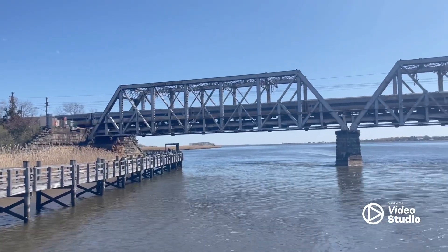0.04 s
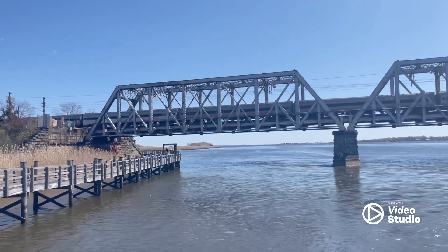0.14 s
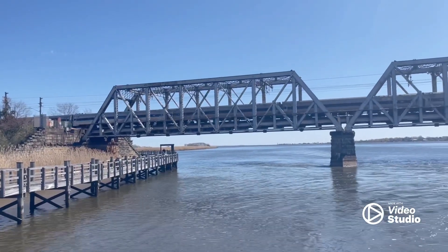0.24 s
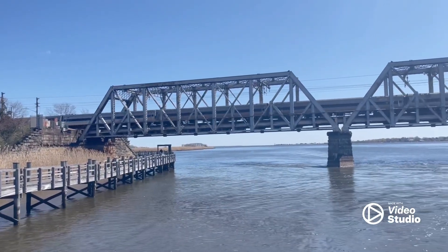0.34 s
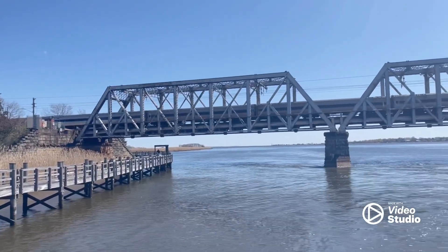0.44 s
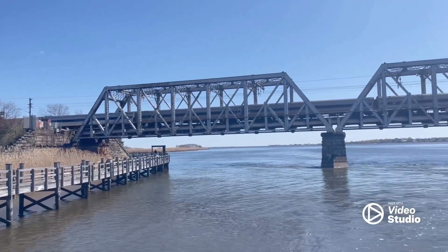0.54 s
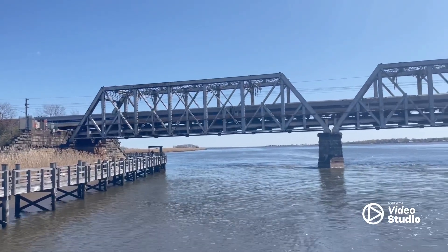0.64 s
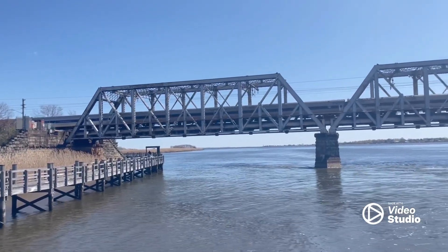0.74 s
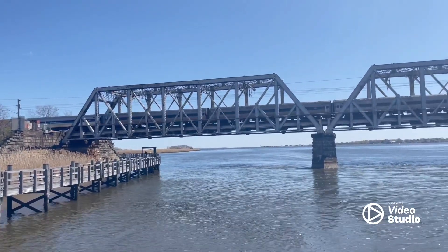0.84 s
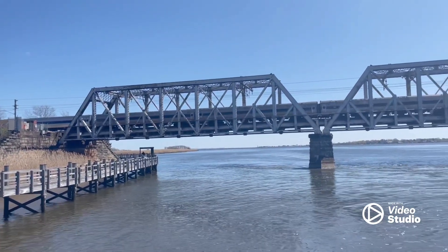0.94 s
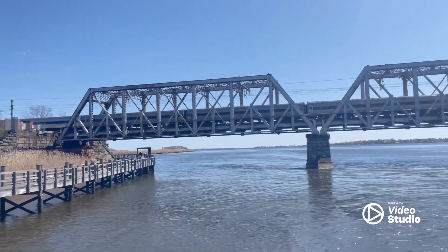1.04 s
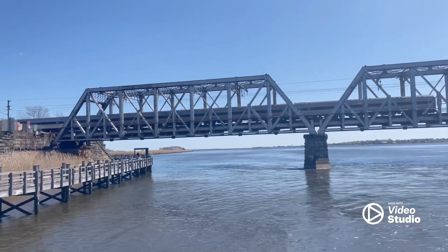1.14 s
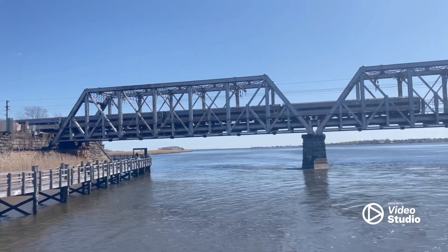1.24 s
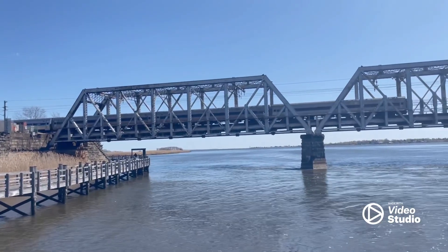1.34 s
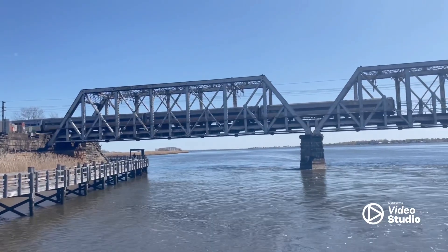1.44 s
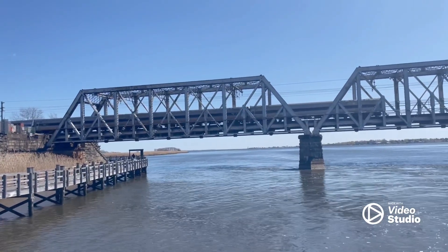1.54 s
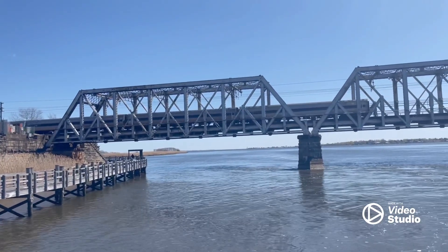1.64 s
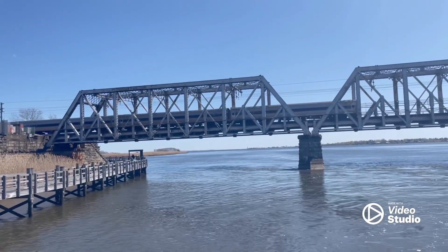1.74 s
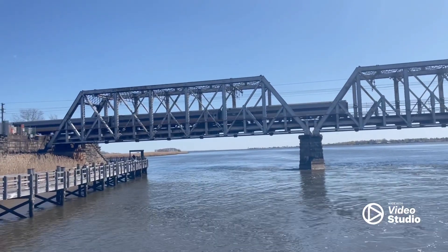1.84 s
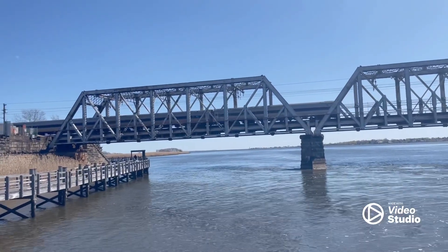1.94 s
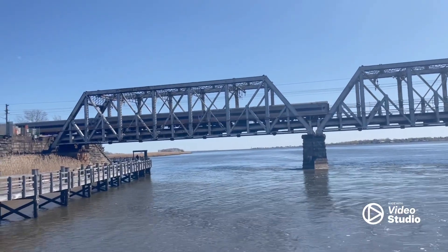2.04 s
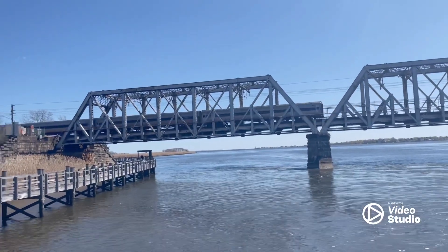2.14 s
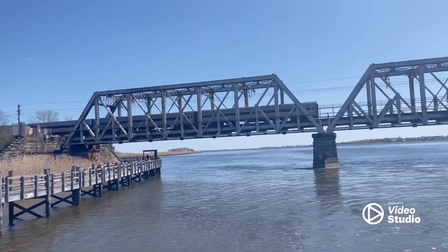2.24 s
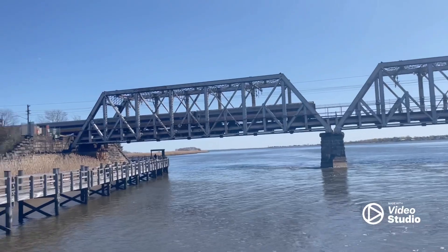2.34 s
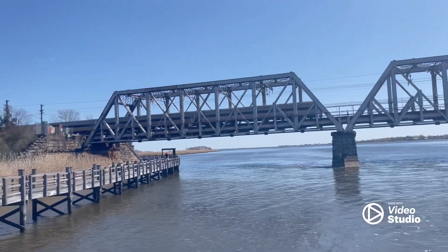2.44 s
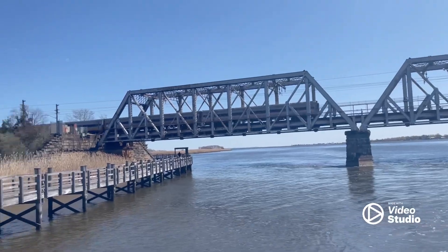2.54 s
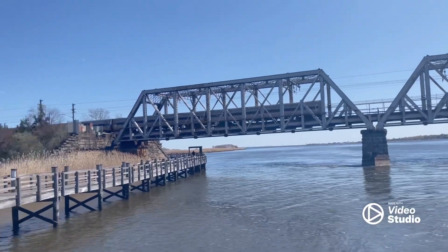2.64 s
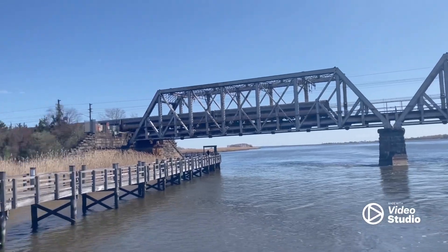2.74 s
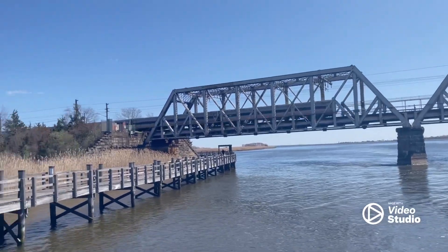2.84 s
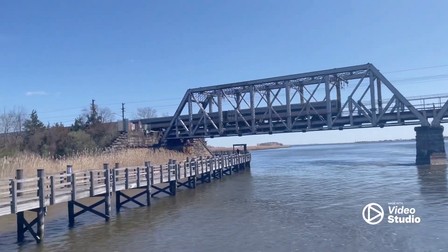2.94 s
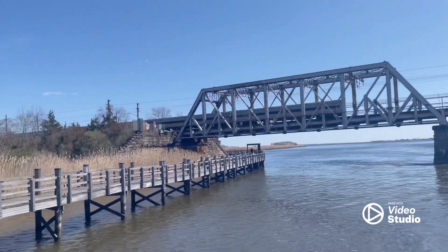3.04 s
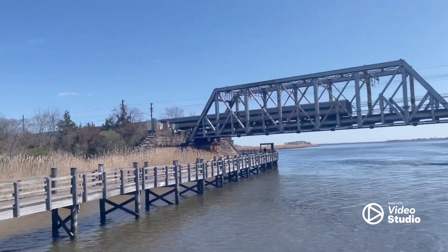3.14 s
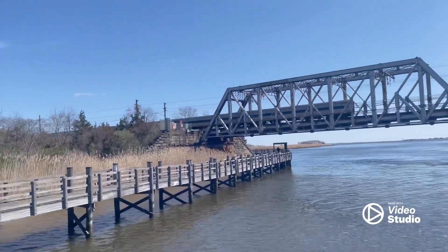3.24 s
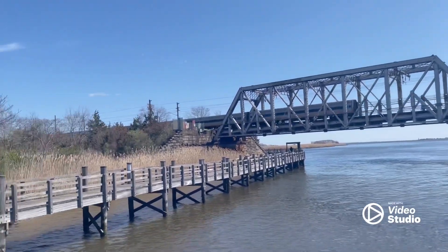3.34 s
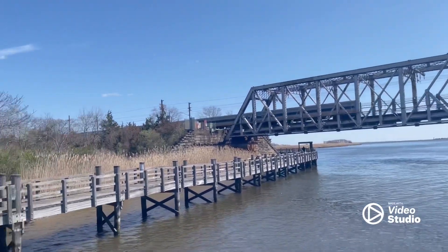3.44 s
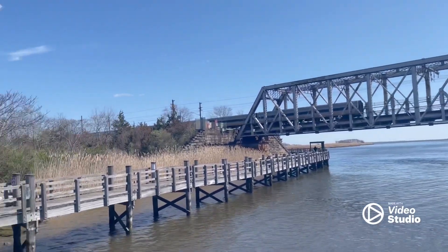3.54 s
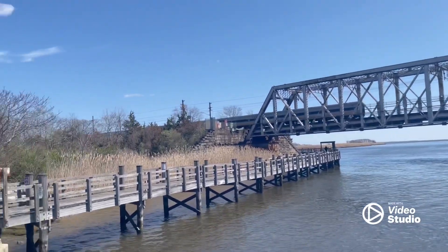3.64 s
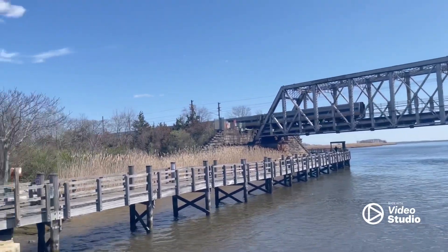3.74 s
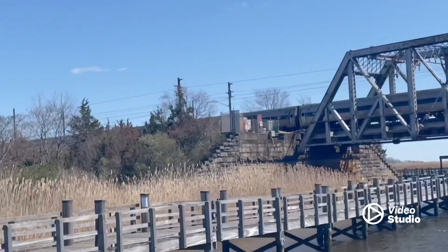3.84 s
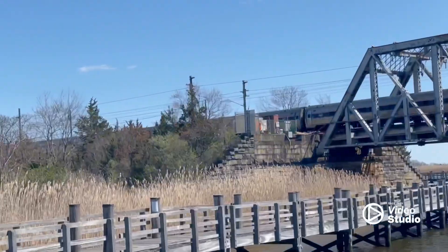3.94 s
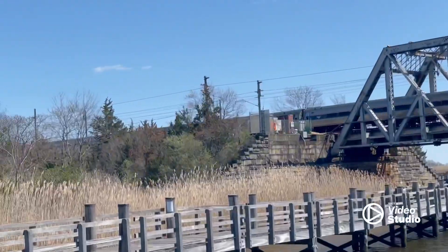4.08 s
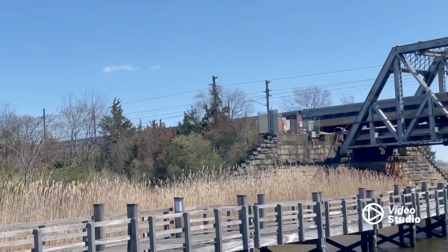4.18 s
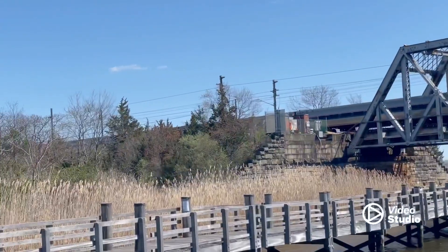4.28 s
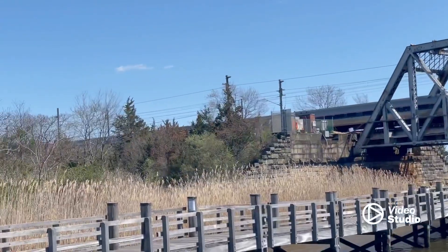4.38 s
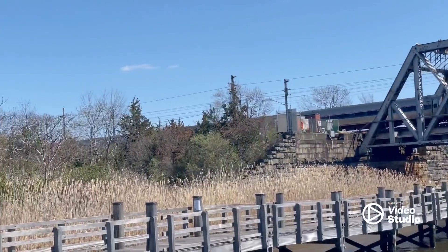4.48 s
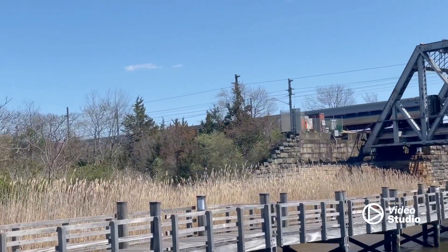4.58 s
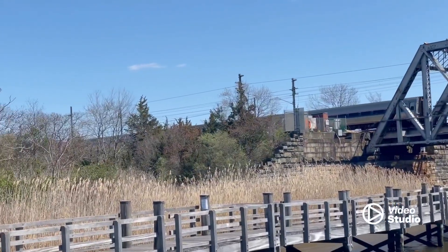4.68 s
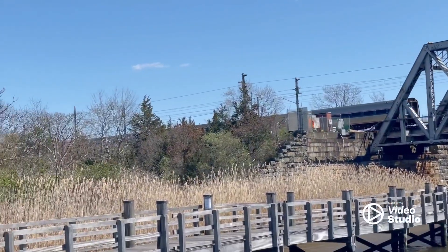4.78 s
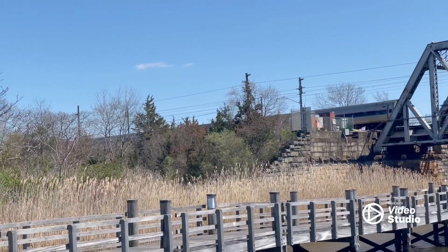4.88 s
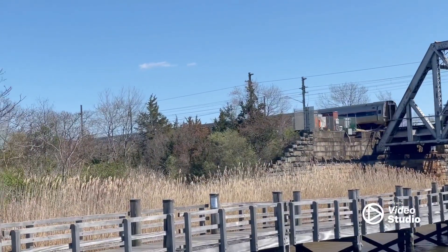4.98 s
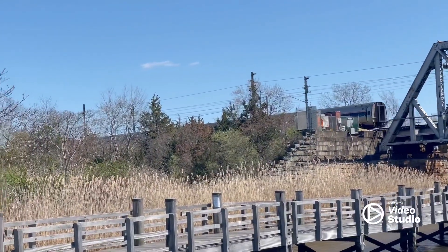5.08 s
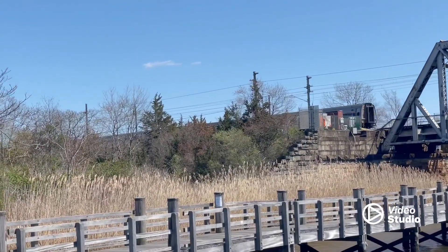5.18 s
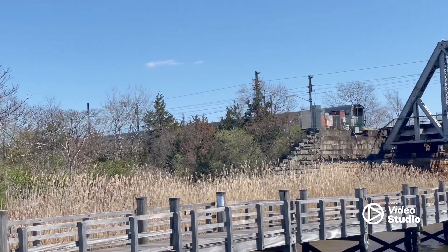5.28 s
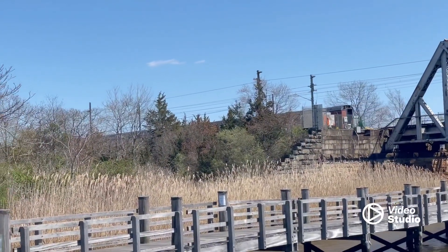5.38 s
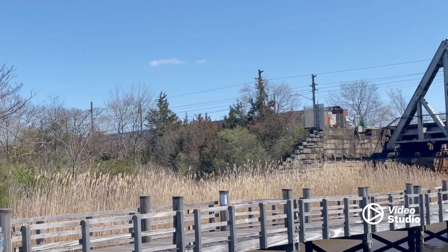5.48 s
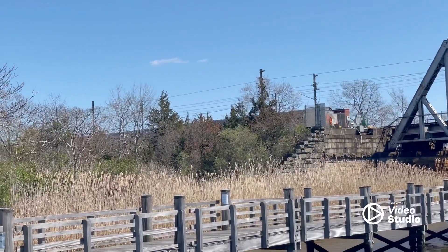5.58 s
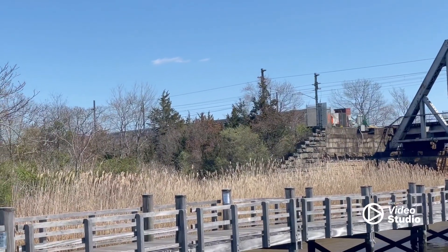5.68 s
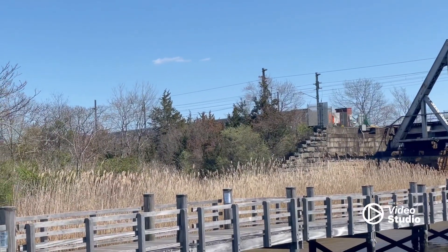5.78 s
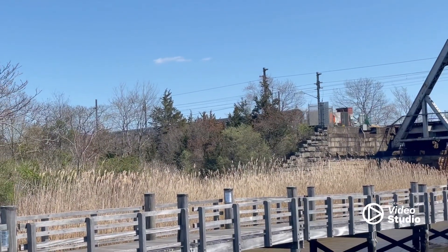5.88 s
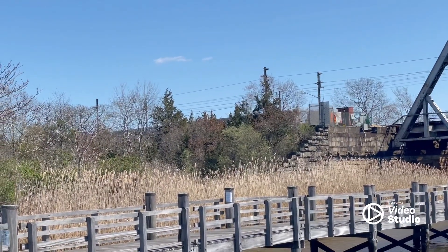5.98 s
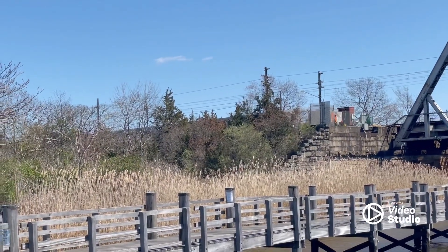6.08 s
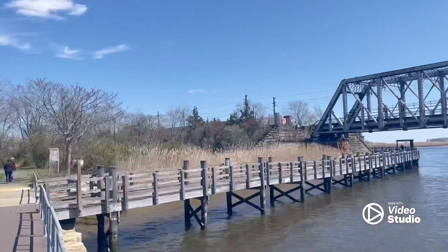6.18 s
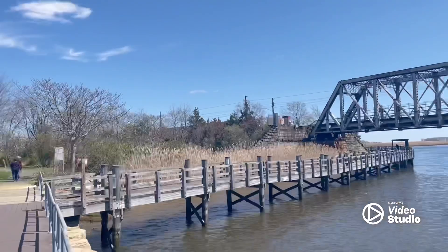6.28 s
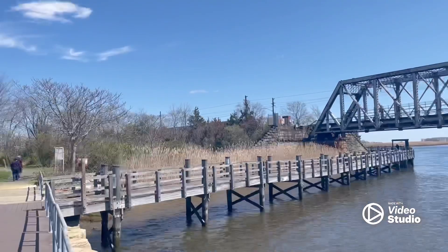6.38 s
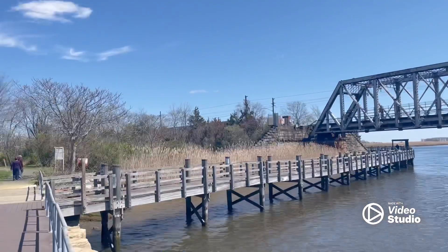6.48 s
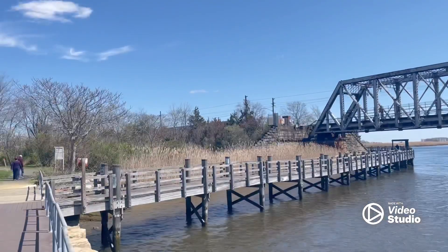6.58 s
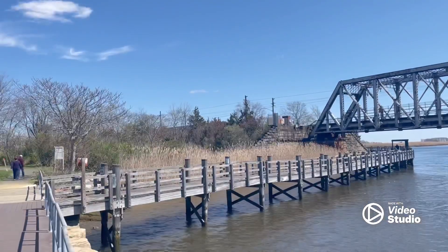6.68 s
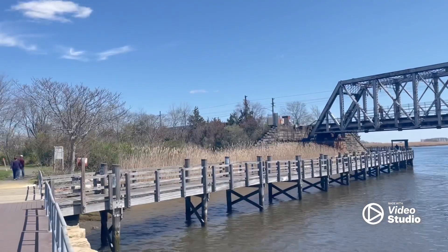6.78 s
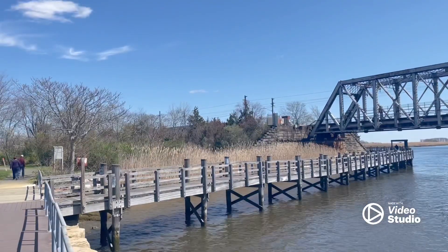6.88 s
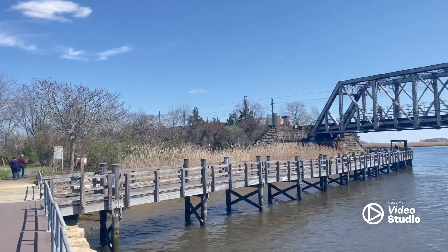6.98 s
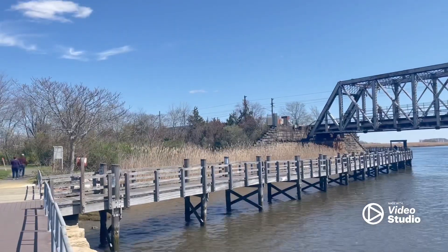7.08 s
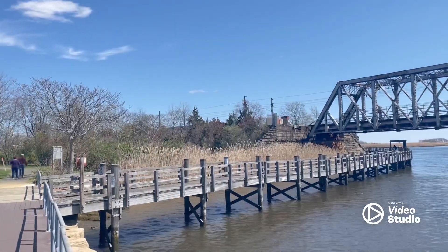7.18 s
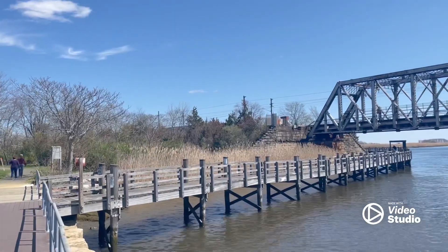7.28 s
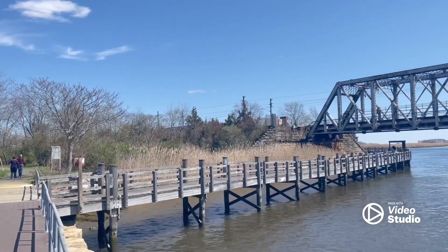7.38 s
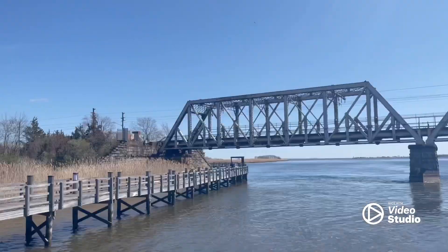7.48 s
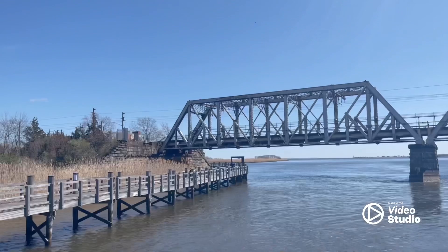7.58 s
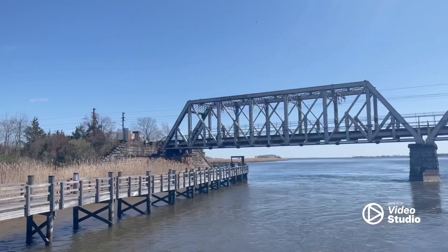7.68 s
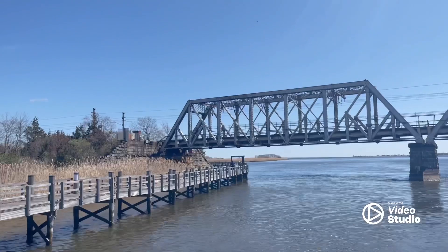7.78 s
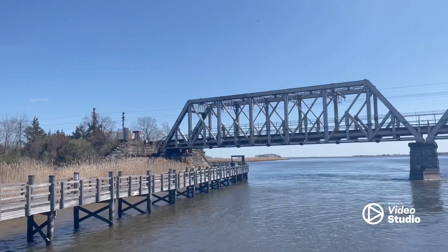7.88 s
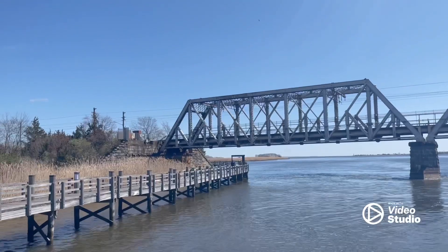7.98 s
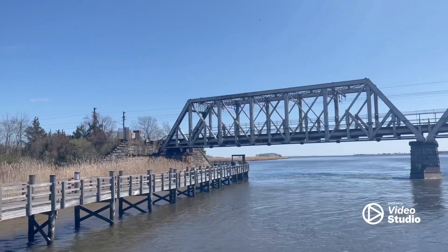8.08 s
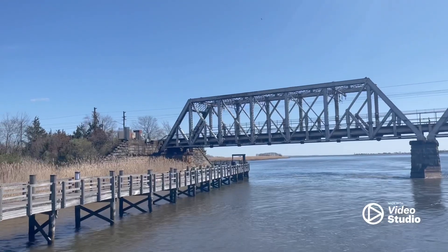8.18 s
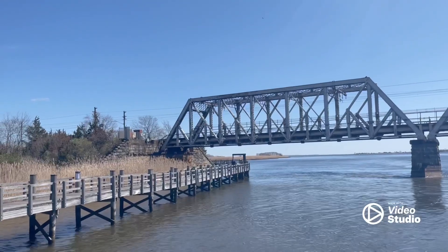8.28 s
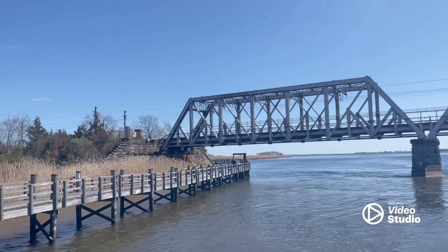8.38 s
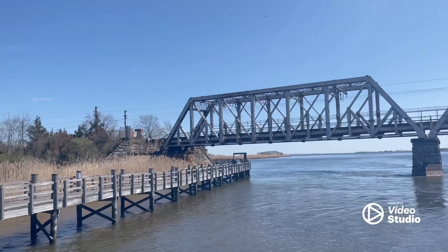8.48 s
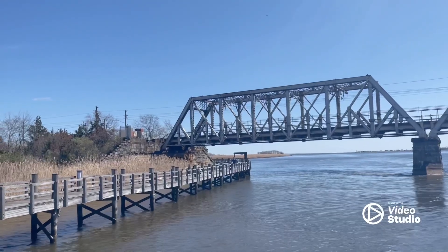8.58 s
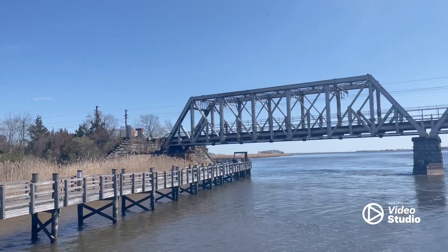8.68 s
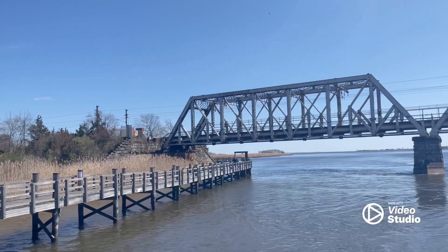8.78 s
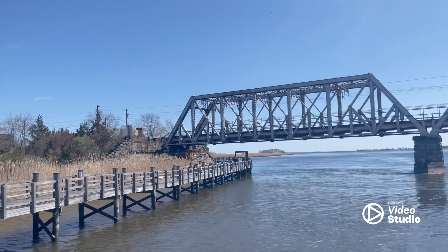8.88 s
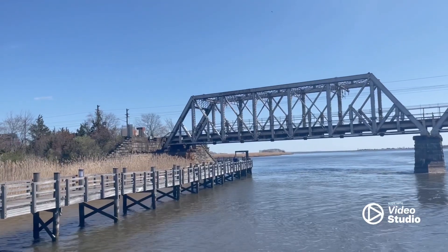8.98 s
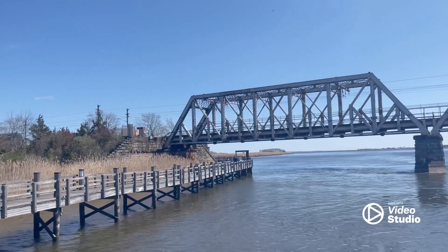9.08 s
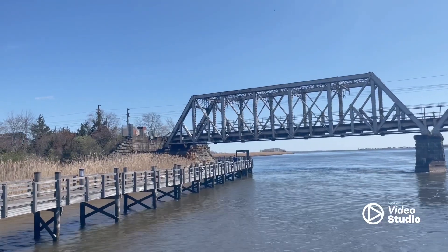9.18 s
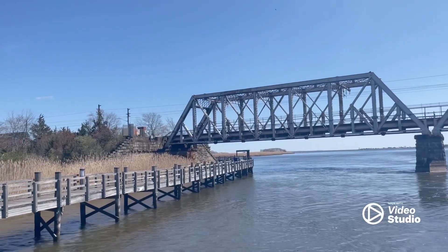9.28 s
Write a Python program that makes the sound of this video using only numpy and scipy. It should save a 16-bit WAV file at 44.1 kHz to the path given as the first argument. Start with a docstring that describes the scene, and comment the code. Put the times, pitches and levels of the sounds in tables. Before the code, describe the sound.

A stereo microphone on the riverbank hears train wheels pounding bridge joints in clustered double clanks, over a thick rumble and ringing girders. High wheel tones waver and short squeals echo in the truss; the last wheels grind and chirp. The train falls away quickly into a quiet lull with small ticks. Then a close knock, and a steady, throbbing low engine drone with a soft air rush, faint reeds and a little water fizz.

```python
"""At a river: a passenger train rolls over a steel truss bridge and runs off behind the bank.
Wheel impacts on rail joints excite clangs and girder modes; shaped noise booms, roars, rattles and grinds.
Flanges sing as wandering sine modes, over open air, faint reeds and the fizz of lapping water.
After a lull and a knock near the microphone, a low engine drone of summed firing orders sets in
abruptly and slowly speeds up."""
import sys
import numpy as np
from scipy import signal
from scipy.fft import rfft, irfft
from scipy.io import wavfile
from scipy.ndimage import uniform_filter1d

SR = 44100
rng = np.random.default_rng(int(sys.argv[2]) if len(sys.argv) > 2 else 0)


def transcribe(signal):
    """Save signal, clipped to [-1, 1], as a 16-bit WAV file at the path in sys.argv[1]."""
    frames = np.atleast_2d(signal).T
    limited = np.clip(frames, -1, 1)
    pcm = np.round(limited * 32767).astype(np.int16)
    wavfile.write(sys.argv[1], SR, pcm)


N = 411012
T = np.arange(N) / SR  # s
HOP, FRAME = 512, 2048  # samples between and within noise frames

# phase by which the left port leads the right: freq_hz, lead_rad
PORT_LEAD = [(60, -0.26), (260, -0.51), (520, 0.11), (700, 1.3), (950, 1.13), (1700, 0.34), (3300, 1.2),
             (5000, 0.86)]
# bogies reaching the joints, in pairs, one pair per coupling, then the tail alone; blow levels before
# the joint and axle gains: start_s, blow_db, treble_db (per decade), rattle_db, grind_db
BOGIE_PASSES = [(-0.131, -16, 12, -46, -50), (0.26, -15.5, 4, -54, -49), (1.155, -14.5, -1, -44, -51),
                (1.528, -14, -3, -51, -54), (2.415, -13.5, -4.5, -40.5, -50),
                (2.802, -14.5, -6.5, -34.5, -42), (3.657, -14.5, -1, -40, -35.5),
                (4.027, -14.5, 0, -42.5, -37.5), (4.865, -14, 0.5, -39.5, -37)]
AXLE_GAP_S = 0.127  # from a bogie's first wheel to its second


def amp(db):
    """Level law: decibels become an amplitude ratio."""
    return 10 ** (np.asarray(db) / 20)


def evened(x):
    """Power normalisation: scales to rms 1."""
    return x / np.sqrt(np.mean(x ** 2) + 1e-20)


def read(points, hz):
    """Spectral interpolation: reads a table on a log-frequency axis."""
    f, value = np.transpose(points)
    return np.interp(np.log(hz + 1), np.log(f + 1), value)


def curves(rows):
    """Envelope interpolation: every column of a table at every sample."""
    s, *columns = np.transpose(rows)
    return [np.interp(T, s, column) for column in columns]


def add(mix, s, sound):
    """Superposition: mixes a stereo sound in at time s, which may lie before zero."""
    start = round(s * SR)
    part, sound = mix[:, max(start, 0):], sound[:, max(-start, 0):]
    part[:, :sound.shape[1]] += sound[:, :part.shape[1]]


def drift(rate_hz):
    """Low-passed random fluctuation of rms 1: white noise under a Gaussian spectrum."""
    s = T[::64]
    hz = np.fft.rfftfreq(len(s), s[1])
    spectrum = rfft(rng.standard_normal(len(s))) * np.exp(-(hz / rate_hz) ** 2)
    return evened(np.interp(T, s, irfft(spectrum, len(s))))


def noise(spectrum, lead, patchy_db, size=N, t60=None, ripple_db=0):
    """Partly coherent, coloured, patchy noise at two microphone ports; with t60 it dies band by band."""
    # coherence of the ports: freq_hz, likeness
    likeness = [(60, 1), (210, 0.99), (400, 0.91), (720, 0.83), (1350, 0.79), (2500, 0.6), (5000, 0.29)]
    # left minus right: freq_hz, balance_db
    balance = [(60, -2), (120, 0.0), (260, 0.5), (530, -3.5), (1090, -1.5), (2260, -2.5), (4670, 0.5)]
    frames, hz = size // HOP + 5, np.fft.rfftfreq(FRAME, 1 / SR)
    a, b, c, d, patches = rng.standard_normal((5, frames, len(hz)))
    same = np.clip(read(likeness, hz), -1, 1)
    left = a + 1j * b
    right = same * left + np.sqrt(1 - same ** 2) * (c + 1j * d)
    right = right * np.exp(-1j * read(lead, hz))
    side = amp(read(balance, hz) / 2)
    patches = uniform_filter1d(uniform_filter1d(patches, size=6, axis=0), size=9, axis=1)
    level_db = read(spectrum, hz) + patchy_db * evened(patches) + ripple_db
    z = np.array([left * side, right / side]) * amp(level_db)
    if t60 is not None:
        frame_s = np.arange(frames)[:, None] * HOP / SR
        z *= amp(-60 * frame_s / read(t60, hz))
    sound = signal.istft(z.swapaxes(-1, -2), nperseg=FRAME, noverlap=FRAME - HOP)[1]
    return evened(sound[:, :size])


def steadied(x, size):
    """Envelope division: takes the chance swells out of a noise."""
    return x / np.sqrt(uniform_filter1d((x ** 2).mean(0), size) + 1e-9)


def steel_modes(depth_db=2.5):
    """Modal density: countless narrow modes of rails and truss wax and wane; dB by frame and bin."""
    # harshness, strongest around 3 to 3.85 s, centred on 2 kHz: time_s, level_db
    harshness = [(2.2, -2.5), (3, 2), (3.85, 1.5), (6.5, -3.5)]
    hz, s = np.fft.rfftfreq(FRAME, 1 / SR), np.arange(N // HOP + 5) * HOP / SR
    field = uniform_filter1d(rng.standard_normal((len(s), len(hz))), size=45, axis=0)
    octaves = np.log2((hz + 1) / 2000)
    harsh = np.interp(s, *np.transpose(harshness))[:, None] * np.exp(-octaves ** 2 / 2)
    return harsh + depth_db * evened(field) * np.clip(hz / 300, 0, 1)


def rolling(modes_db, roar_db=-3.0, judder_db=0.5, judder_hz=30, lurch_db=1):
    """Roughness excitation: wheels shake deck and rails, swelling as each bogie crosses the joints."""
    # rolling, fading behind the bank, before trim and swells: time_s, boom_db, roar_db
    fading = [(0, -17.5, -24), (0.8, -17.5, -24.5), (2.1, -17.5, -26.5), (3.3, -18.5, -28.5),
              (4.45, -19, -32), (4.8, -25.5, -35), (5.15, -20, -32.5), (5.6, -31.5, -41.5),
              (6.2, -35.5, -43.5), (7.45, -36, -52), (7.8, -39, -62)]
    # boom of the deck: freq_hz, relative_density_db
    boom_colour = [(20, -50), (33, -31.5), (42, -21), (52, -1.5), (70, 2), (96, -3), (120, 4), (145, -8),
                   (160, -14.5), (174, -5.5), (205, -17), (290, -16.5), (400, -36), (1500, -100)]
    # roar of the rails: freq_hz, relative_density_db
    roar_colour = [(120, -15.5), (275, 3), (365, -4), (430, 0.5), (570, -0.5), (730, -8.5), (810, -6),
                   (1400, -13.5), (2100, -16.5), (2480, -22), (2800, -20), (3150, -26.5), (3700, -25),
                   (7200, -47.5), (8500, -62)]
    shake_delay_s, shake_width_s, shake_boom_db, shake_roar_db = 0.15, 0.14, 3, 4
    boom_level_db, roar_level_db = curves(fading)
    shake = sum(np.exp(-((T - s - shake_delay_s) / shake_width_s) ** 2) for s, *_ in BOGIE_PASSES)
    boom = steadied(noise(boom_colour, PORT_LEAD, patchy_db=1.5), size=3500)
    boom *= amp(boom_level_db + shake_boom_db * shake + lurch_db * drift(11))
    roar = noise(roar_colour, PORT_LEAD, patchy_db=1.55, ripple_db=modes_db)
    judder = judder_db * drift(judder_hz)
    roar = steadied(roar, size=4000) * amp(roar_level_db + roar_db + shake_roar_db * shake + judder)
    return boom + roar


def blows():
    """Impact sequence: wheels strike both joints, with further single knocks: time_s, level_db, treble_db."""
    # a light, bright joint, then a heavy, dull one: delay_s, gain_db, treble_db
    joints = [(0, -8.5, 11), (.092, 0, -2.5)]
    # further hard single knocks among the wheel blows, the last a dull late thump:
    # time_s, level_db, treble_db
    single_knocks = [(0.546, -22.5, 0), (1.268, -18, -4), (1.66, -18, -3), (1.742, -16.5, -6),
                     (2.95, -19, 0.5), (4.19, -19.5, -2), (4.244, -20, -3), (4.885, -23, 5),
                     (4.944, -16, -2.5), (4.982, -15.5, 0.5), (5.17, -18.5, -15)]
    second_axle_db = 1
    struck = []
    for s, db, treble_db, *_ in BOGIE_PASSES:
        for axle in (0, 1):
            for delay, joint_db, joint_treble_db in joints:
                time_s = s + axle * AXLE_GAP_S + delay
                level_db = db + joint_db + axle * second_axle_db
                struck.append((time_s, level_db, treble_db + joint_treble_db))
    return struck + list(single_knocks)


def clacks(modes_db, clang_db=-6, crack_s=0.0071, ring_db=-10, attack_s=0.0038):
    """Impulse response: each blow is a short crack, a dense truss clang and the ring of the girders."""
    # clang of a blow: freq_hz, relative_density_db
    clang_colour = [(30, -39), (70, 11), (125, 16.5), (190, 7.5), (250, 0), (365, -4), (450, 8), (530, 1),
                    (620, 3), (740, -7), (1300, -14), (2100, -20.5), (2450, -29), (2800, -19),
                    (3200, -25.5), (3900, -29.5), (5200, -37), (8800, -60.5)]
    # girder modes, before ring_db: freq_hz, level_db, t60_s
    girders = [(181, -9.5, 0.18), (292, -6, 0.58), (425.6, -2.5, 0.32), (442.5, 0, 0.27),
               (530, -13.5, 0.29), (580, -9.5, 0.27), (809, -12.5, 0.44), (966, -6.5, 0.13),
               (1970, -25.5, 0.93)]
    # decay of the clang in the truss: freq_hz, t60_s
    truss_decay = [(60, 0.77), (450, 0.47), (1500, 0.55), (4000, 0.6), (8000, 0.11)]
    out, t = np.zeros((2, N)), np.arange(SR // 2) / SR
    for s, db, treble_db in blows():
        # the treble tilt acts over the decade from 400 Hz
        colour = [(hz, level + treble_db * np.clip(np.log10(hz / 400), 0, 1)) for hz, level in clang_colour]
        ripple_db = modes_db[max(int(s * SR), 0) // HOP]
        clang = noise(colour, PORT_LEAD, patchy_db=1, size=len(t), t60=truss_decay, ripple_db=ripple_db)
        clang *= amp(clang_db) / np.std(clang[:, :SR // 20])
        clang *= 1 + np.exp(-t / crack_s)
        # every blow meets the girders at another place, so their modes mix anew
        ring = 0
        for hz, level, t60 in girders:
            turns = hz * (1 + 0.005 * rng.standard_normal()) * t + rng.random()
            ring = ring + amp(level - 60 * t / t60) * np.sin(2 * np.pi * turns)
        ring = amp(ring_db) * ring * amp([[-2], [2]])
        add(out, s, amp(db) * (clang + ring) * (1 - np.exp(-t / attack_s)))
    return out


def rattle(delay_s=0.1, width_s=0.031, grains_per_s=200, grain_s=0.023, second_db=1):
    """Random impacts: as each wheel leaves the heavy joint, loose bogie gear knocks irregularly."""
    # loose metal: freq_hz, relative_density_db
    colour = [(200, -20), (430, 0.5), (620, 4.5), (950, 7), (1400, -3.5), (2100, -1.5), (2800, -9.5),
              (3200, -16.5), (3900, -13), (5200, -27.5), (7500, -46.5), (9000, -59.5)]
    surge = 0
    for s, _, _, db, _ in BOGIE_PASSES:
        for axle in (0, 1):
            burst = np.exp(-((T - s - axle * AXLE_GAP_S - delay_s) / width_s) ** 2)
            surge = surge + amp(db + axle * second_db) * burst
    hits = (rng.random(N) < grains_per_s / SR) * rng.uniform(0.67, 1, N)
    grains = evened(signal.lfilter([1], [1, -np.exp(-1 / (grain_s * SR))], hits))
    return noise(colour, PORT_LEAD, patchy_db=4.0) * grains * surge


def grinding(length_s=0.24, attack_s=0.0053, release_s=0.054, grit_db=3.0, grit_hz=110):
    """Frictional excitation: between its first and last joint a bogie grinds grittily over the rail ends."""
    # grinding steel: freq_hz, relative_density_db
    colour = [(300, -17.5), (950, 1), (2100, 1), (2850, -2.5), (3200, -15.5), (3700, -10.5), (4500, -14),
              (7300, -35.5), (8800, -52)]
    gate = 0
    for s, *_, db in BOGIE_PASSES:
        attack = 1 - np.exp(-np.maximum(T - s, 0) / attack_s)
        release = np.exp(-np.maximum(T - s - length_s, 0) / release_s)
        gate = gate + amp(db) * attack * release
    grit = amp(grit_db * drift(grit_hz))
    return evened(noise(colour, PORT_LEAD, patchy_db=3.0) * grit) * gate


def singing(waver_hz=14, come_and_go_db=7, flutter_hz=25):
    """Modal resonance: on the open span wheel modes come and go, fluttering differently at each port."""
    # wheel modes: freq_hz, level_db
    wheel_modes = [(2900, -66.5), (3500, -64), (3640, -61.5), (3864, -66), (4245, -70), (5726, -80),
                   (6976, -83.5), (11890, -89.5), (12115, -89.5)]
    until_s, fade_s = 3.3, 0.7
    out = np.zeros((2, N))
    for hz, db in wheel_modes:
        tone = np.sin(2 * np.pi * np.cumsum(hz + waver_hz * drift(7.1)) / SR)
        tone *= amp(come_and_go_db * np.tanh(drift(4)))
        flutter = np.array([drift(flutter_hz), drift(flutter_hz)])
        out += amp(db) * evened(tone * (1 + flutter))
    return out * np.clip((until_s - T) / fade_s, 0, 1)


def open_air():
    """Broadband ambience: steady coloured noise of the open air over the water."""
    # open air: freq_hz, relative_density_db
    colour = [(120, -27.5), (200, -10.5), (330, -16), (363, 1), (400, -10.5), (1080, -10.5), (1660, -27.5),
              (1830, -22), (2360, -33), (3600, -33), (5120, -50), (6660, -80), (11300, -120)]
    return amp(-50.5) * noise(colour, PORT_LEAD, patchy_db=2.5)


def flanges(level_db=1, rasp_hz=18, rise_hz=8, stutter_db=2.5):
    """Friction-driven modes with multipath: unsteady, rising tones flicker through echoes in the truss."""
    # flanges rubbing the rail, before lead-in, echoes and trim: start_s, length_s, pitch_hz, level_db
    squeals = [(.03, .15, 3650, -53), (.08, 0.24, 3868, -48.5), (.495, .14, 2890, -48.5),
               (.571, 0.12, 3500, -50.5), (.67, 0.3, 3524, -51), (.662, 0.26, 4045, -57.5),
               (.92, 0.13, 3710, -52.5), (.953, 0.15, 4220, -56), (1.306, 0.18, 3636, -45.5),
               (1.335, 0.21, 3870, -52), (1.5, 0.21, 3500, -53), (1.89, 0.28, 3250, -58.5),
               (1.89, 0.35, 3980, -63.5), (1.895, .23, 5730, -68), (1.92, 0.48, 3488, -57),
               (2.54, .36, 3830, -51.5), (2.563, 0.23, 1934, -47), (2.582, .3, 4660, -59.5),
               (3.215, .11, 4060, -57.5), (3.245, 0.13, 3240, -56), (3.66, 0.11, 3700, -60),
               (3.86, .08, 3610, -51.5), (4.66, 0.15, 2210, -50)]
    out, t = np.zeros((2, N)), np.arange(SR // 8) / SR
    for s, length, hz, db in squeals:
        size = int(length * SR)
        wander = evened(uniform_filter1d(rng.standard_normal(size), size=400))
        swell = np.sqrt(abs(np.sin(np.pi * np.linspace(0, 1, size) ** 0.75)))
        pitch = hz + rasp_hz * wander + rise_hz * np.linspace(-0.5, 0.5, size)
        tone = np.sin(2 * np.pi * np.cumsum(pitch) / SR) * swell * amp(stutter_db * drift(18)[:size])
        echoes = rng.standard_normal((2, len(t))) * np.exp(-t / 0.025)
        paths = echoes + echoes.mean(0)  # the two ports share some of their paths
        sung = signal.fftconvolve(tone[None], paths, axes=1)
        # the energy stays that of the tone's own length
        add(out, s - 0.01, amp(db + level_db) * evened(sung) * np.sqrt(size / sung.shape[1]))
    return out


def tail_squeal(rasp_hz=14, chirp_arch_hz=90, chirp_rasp_hz=40, port_delay_s=0.00005):
    """Stick-slip friction: the last wheels chirp, and whine on a bending pitch, without echoes."""
    # whine clear of the truss, dipping and recovering: time_s, pitch_hz, level_db
    whine = [(4.545, 3345, -75), (4.57, 3335, -51), (4.625, 3256, -50), (4.66, 3270, -52),
             (4.71, 3350, -53), (4.75, 3305, -61), (4.775, 3360, -59), (4.81, 3300, -76)]
    # sticking and slipping flange: start_s, length_s, pitch_hz, level_db
    chirps = [(3.425, .05, 1500, -47), (3.455, 0.05, 1555, -37), (3.472, .025, 2190, -39),
              (3.492, 0.046, 2075, -38), (4.635, .04, 1560, -43), (4.633, 0.033, 1990, -43),
              (4.658, 0.039, 2123, -42), (4.688, 0.031, 2200, -32.5), (4.724, 0.017, 2165, -33),
              (4.747, 0.044, 2290, -49), (4.785, .05, 2170, -50)]
    whine_hz, whine_db = curves(whine)
    sounding = (T > whine[0][0]) & (T < whine[-1][0])
    lag = np.array([[0], [port_delay_s]])
    turns = np.cumsum(whine_hz + rasp_hz * drift(90)) / SR - whine_hz * lag
    out = np.sqrt(2) * np.sin(2 * np.pi * turns) * amp(whine_db) * sounding
    for s, length, hz, db in chirps:
        arch = np.sin(np.pi * np.linspace(0, 1, int(length * SR)))
        bend = chirp_arch_hz * (arch - arch.mean()) + chirp_rasp_hz * drift(250)[:len(arch)]
        turns = np.cumsum(hz + bend) / SR
        add(out, s, amp(db) * arch * np.sin(2 * np.pi * (turns - hz * lag)))
    return out


def far_wheels(wander=0.025, rasp=0.018, hoarse_hz=40):
    """Modulated resonance: far wheels moan hoarsely on a wavering pitch, loudest behind the bank."""
    # moan: time_s, level_db
    moan = [(5.2, -71), (6.1, -63), (6.2, -58), (6.35, -66), (7.5, -72)]
    # modes of the moan: freq_hz, relative_level_db
    modes = [(1075, 0.5), (1850, -7.5), (2750, -11)]
    out = np.zeros((2, N))
    for hz, db in modes:
        pitch = hz * (1 + wander * drift(7) + rasp * drift(120))
        flutter = drift(hoarse_hz) + 0.5 * np.array([drift(hoarse_hz), drift(hoarse_hz)])
        out += amp(db) * evened(np.sin(2 * np.pi * np.cumsum(pitch) / SR) * flutter)
    return out * amp(curves(moan)[0])


def water(drops_per_s=1500, spread_db=3):
    """Damped resonance: lapping water fizzes with tiny bubbles, among small single ticks and drips."""
    # lapping at the bank: time_s, level_db
    lapping = [(7.4, -90), (7.6, -87.5), (7.8, -88), (8.65, -81), (9.0, -72.5), (9.32, -76.5)]
    # small single ticks and drips: time_s, level_db, pitch_hz
    ticks_and_drips = [(5.757, -60, 4600), (6.33, -60, 5600), (8.184, -51, 3400), (8.91, -63, 6950)]
    out, t = np.zeros((2, N)), np.arange(SR // 40) / SR
    for hz in np.geomspace(5500, 12500, num=16):
        strengths = amp(spread_db * np.minimum(rng.exponential(1, N), 4))
        clicks = (rng.random(N) < drops_per_s / 16 / SR) * strengths
        bubble = np.sin(2 * np.pi * hz * t) * t * hz * np.exp(-t * hz / 3) * 3500 / hz
        out += signal.oaconvolve(clicks, bubble)[:N] * rng.uniform(0.13, 1, (2, 1))
    out = evened(out) * amp(curves(lapping)[0])
    for s, db, hz in ticks_and_drips:
        swell = t / 0.00068 * np.exp(1 - t / 0.0011)
        add(out, s, amp(db) * np.ones((2, 1)) * np.sin(2 * np.pi * hz * t) * swell)
    return out


def knocks(port_delay_s=0.00025, thud_s=0.0004, ring=0.074, sag=0.5):
    """Damped oscillation: dull knocks close by sag in pitch at once and reach the right port first."""
    # knocks, before a 1 dB lift: time_s, level_db, settled_pitch_hz
    hits = [(5.923, -26, 766), (7.3256, -14.5, 740), (7.392, -31, 775)]
    out, t = np.zeros((2, N)), np.arange(SR // 20) / SR
    late = np.maximum(t - np.array([[port_delay_s], [0]]), 0)
    thud = (late / thud_s / 2) ** 2 * np.exp(2 - late / thud_s)
    swell = thud + ring * (late / 0.0013) ** 2 * np.exp(-late / 0.0017) * 2
    for s, db, hz in hits:
        turns = hz * (late + sag * 0.00075 * (1 - np.exp(-late / 0.0022)))
        add(out, s, amp(db + 1.0) * swell * np.sin(2 * np.pi * turns))
    return out


def reeds(crackle_db=4.0):
    """Amplitude-modulated noise: dry reeds rustle softly."""
    # rustling, before the crackle: time_s, level_db
    rustle = [(7.43, -83), (7.48, -60), (7.53, -73), (7.6, -59), (7.68, -69), (7.8, -92), (8.3, -75),
              (9.32, -70.5)]
    # dry reeds: freq_hz, relative_density_db
    colour = [(1500, -25.5), (3000, -7.5), (3700, 1.5), (4500, 0), (5400, -15.5), (7200, -19), (9000, -26),
              (12000, -26)]
    return noise(colour, PORT_LEAD, patchy_db=3) * amp(curves(rustle)[0] + crackle_db * drift(120))


def engine(hum_hz=96.3, hum_db=-17, rumble_db=-16):
    """Harmonic orders: uneven firings make a throbbing drone, under a wavering hum and a rush of air."""
    # firing rate, before its small drift: time_s, rate_hz
    speed = [(7.46, 51.87), (8.5, 52.84), (9.32, 56.8)]
    # levels, the rush before a 4.5 dB lift: time_s, drone_db, rush_db
    levels = [(7.5, -16.5, -43), (8.3, -15, -42.5), (8.8, -13, -44.5), (9.32, -12.5, -36)]
    # orders of the eight-firing cycle: multiple, relative_level_db
    orders = [(7, -29.5), (8, 10.5), (9, -6), (10, -37), (16, -33)]
    # faint steady whine over the drone: freq_hz, level_db
    machine_tones = [(738, -56), (985, -58)]
    # low rumble: freq_hz, relative_density_db
    rumble_colour = [(25, -24), (55, -2), (110, -1.5), (150, -17), (200, -13.5), (280, -22), (400, -43),
                     (900, -94)]
    # rush of air: freq_hz, relative_density_db
    rush_colour = [(110, -3.5), (190, -1), (270, -3), (360, -7.5), (480, -1), (620, -1), (800, -4.5),
                   (1050, -5), (1550, -17.5), (2250, -19.5), (3100, -31), (4300, -33), (5400, -46.5),
                   (7000, -50.5), (9000, -49)]
    # left port ahead of the right in the rush: freq_hz, lead_rad
    rush_lead = [(60, 2.5), (300, -1.5), (500, -0.7), (720, 2), (1100, 2.5), (1500, 4), (2000, 5),
                 (3000, 7), (4200, 16.5)]
    on_s, onset_s = 7.462, 0.017
    (firing_hz,), (drone_db, rush_db) = curves(speed), curves(levels)
    cycles = np.cumsum(firing_hz + 0.3 * drift(6)) / SR / 8
    drone = evened(sum(amp(db) * np.sin(2 * np.pi * (k * cycles + rng.random())) for k, db in orders))
    hum = np.sin(2 * np.pi * np.cumsum(hum_hz + 1.5 * drift(4)) / SR)
    hum = amp(hum_db) * evened(hum * amp(2.5 * drift(3)))
    rumble = amp(rumble_db) * noise(rumble_colour, PORT_LEAD, patchy_db=1.5)
    rush = amp(rush_db + 4.5) * noise(rush_colour, rush_lead, patchy_db=2.5)
    whine = 0
    for hz, db in machine_tones:
        tone = np.sin(2 * np.pi * np.cumsum(hz + drift(5)) / SR)
        whine = whine + amp(db) * evened(tone * amp(2 * drift(3)))
    low = amp(drone_db) * ((drone + hum) * amp([[-0.9], [0.9]]) + rumble)
    return (low + rush + whine) * np.clip((T - on_s) / onset_s, 0, 1)


def scene():
    """Linear superposition of train, open air, water, knocks, reeds and engine."""
    modes_db = steel_modes()
    train = rolling(modes_db) + clacks(modes_db) + rattle() + grinding()
    train += singing() + flanges() + tail_squeal() + far_wheels()
    return train + open_air() + water() + knocks() + reeds() + engine()


def record(dry, low_cut_hz=42, edge_hz=13000):
    """Linear filtering: the microphone's low cut and the recorder's band limit, with short end fades."""
    thinned = signal.sosfilt(signal.butter(4, low_cut_hz, "high", fs=SR, output="sos"), dry)
    faded = thinned * signal.windows.tukey(N, 0.001)
    band_limit = signal.firwin(511, edge_hz, window=("kaiser", 9), fs=SR)
    return signal.oaconvolve(faded, band_limit[None], "same")


dry = scene()
out = record(dry)
transcribe(out)
```